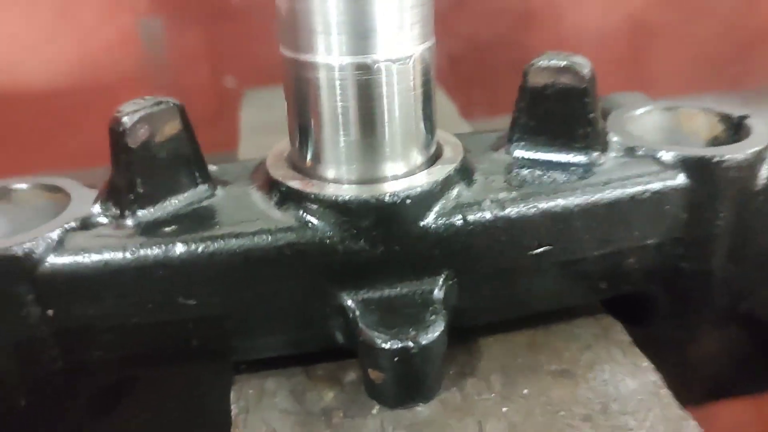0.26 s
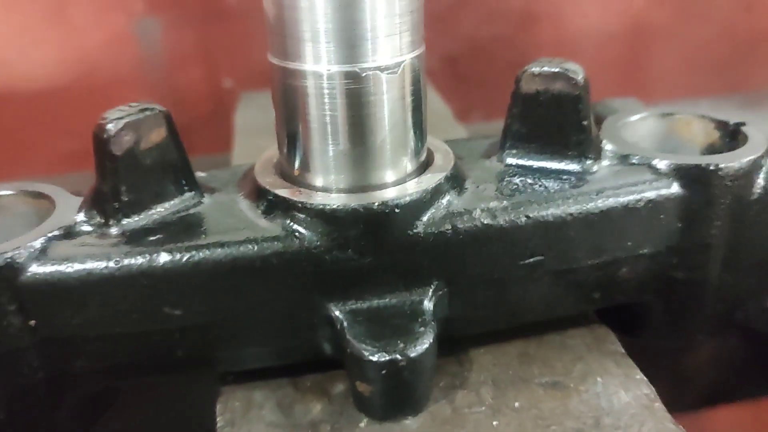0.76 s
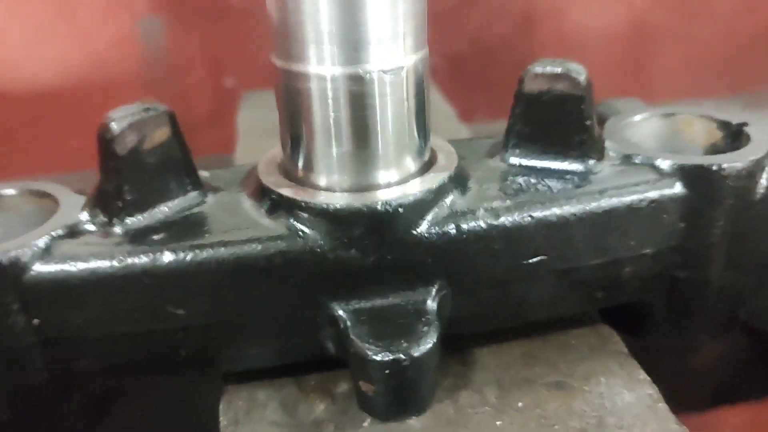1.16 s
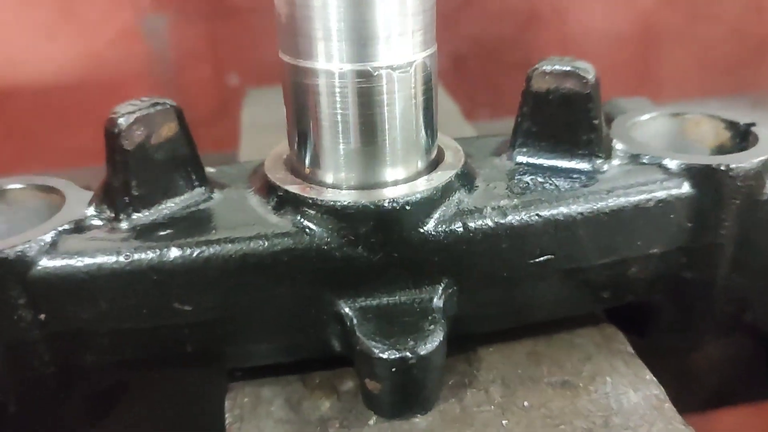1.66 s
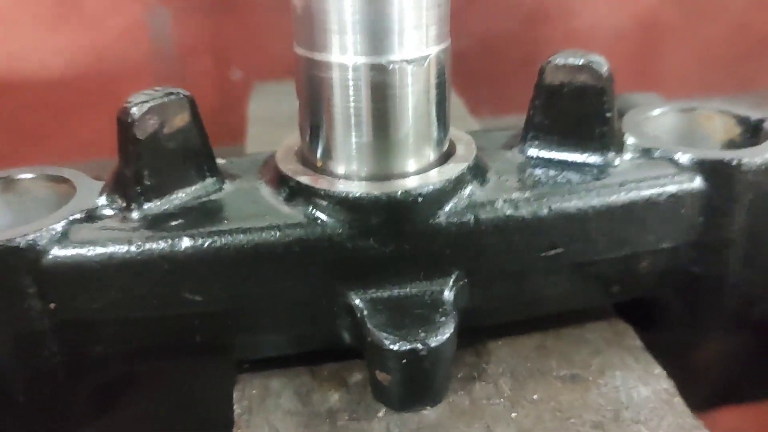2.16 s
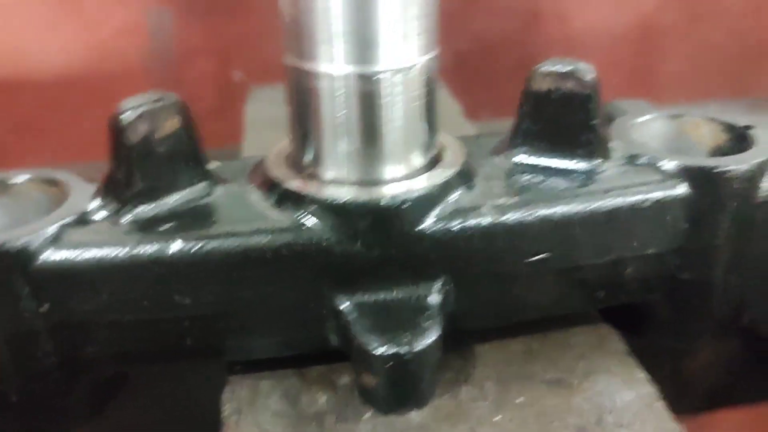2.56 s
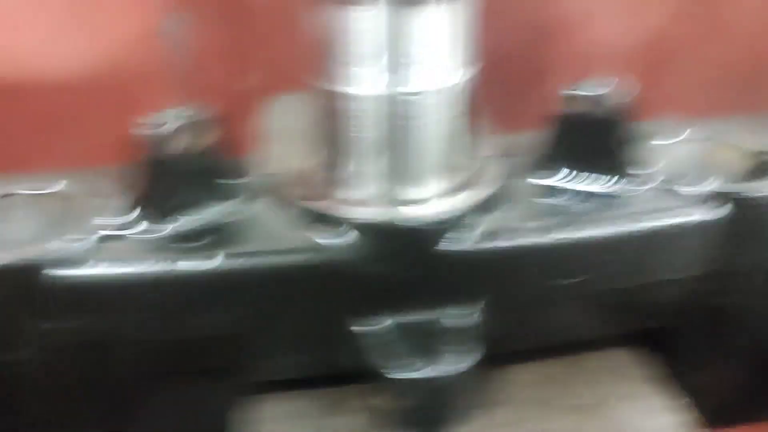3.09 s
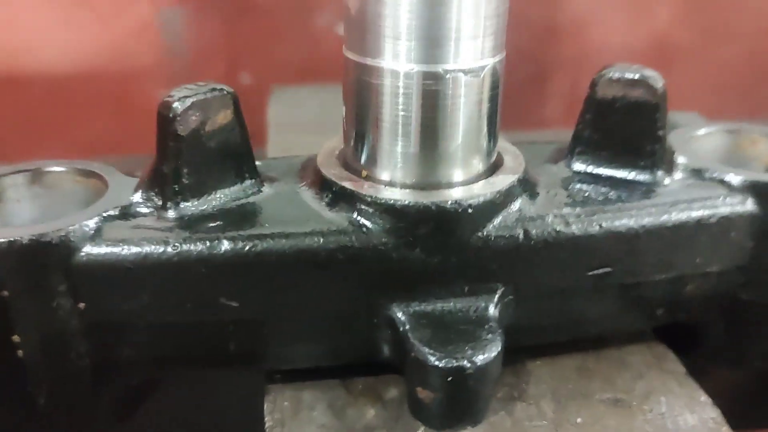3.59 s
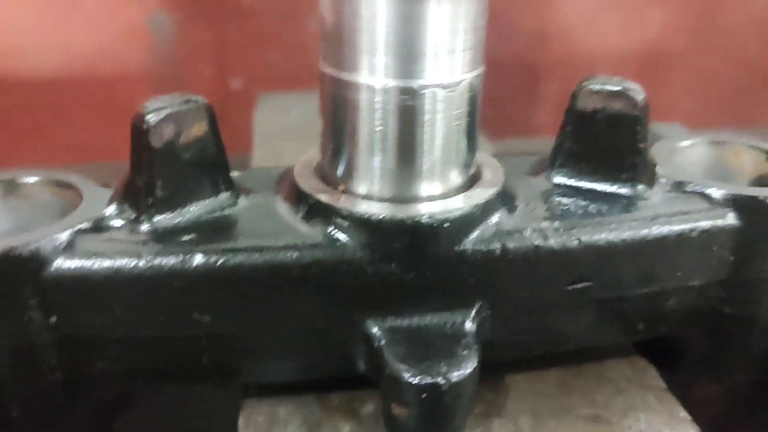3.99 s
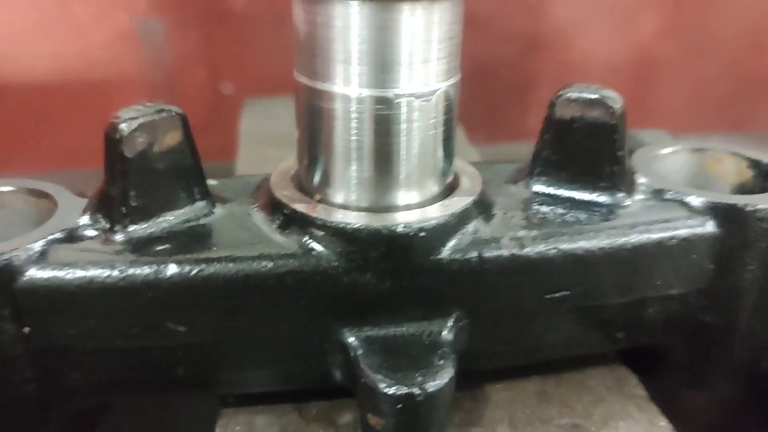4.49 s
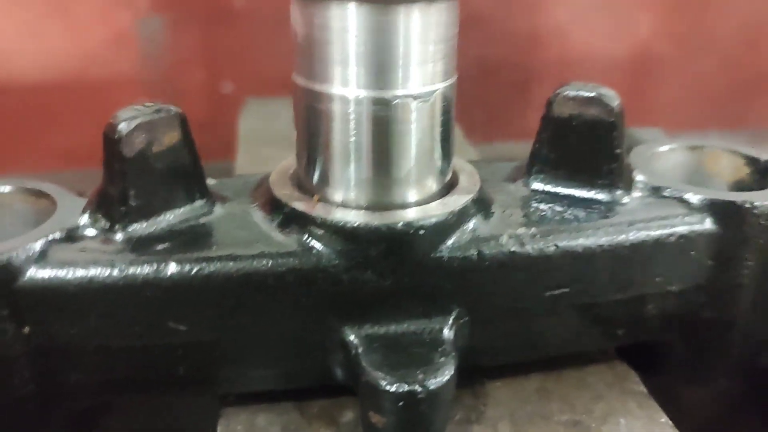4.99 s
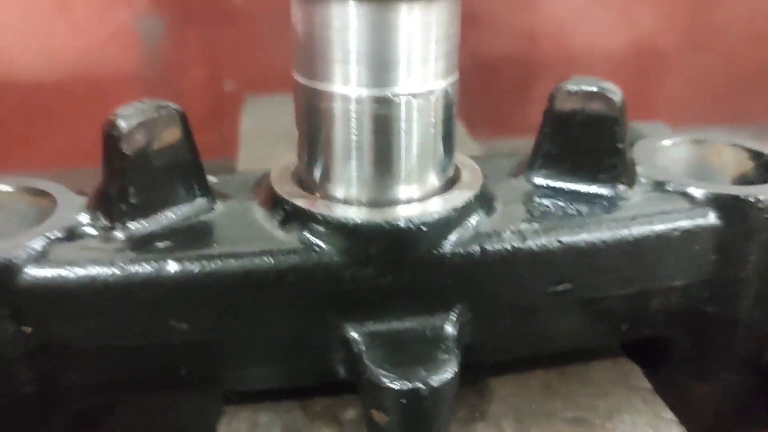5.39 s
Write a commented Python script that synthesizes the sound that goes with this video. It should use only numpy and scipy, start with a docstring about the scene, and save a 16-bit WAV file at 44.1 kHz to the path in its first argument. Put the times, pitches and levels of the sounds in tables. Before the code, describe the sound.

Eight even metallic pump strokes click, knock and rattle close up, with a faint low hum and rumble wavering beneath in a reverberant workshop.

```python
"""A hydraulic shop press is pumped by hand, eight strokes in a hard-walled workshop.
In each stroke a loose lever pin clacks, the linkage scrapes, catches and snaps tight, and oil whistles thinly.
The steel frame takes a knock, clatters, booms and ticks, then an after-knock, later and weaker as the load grows;
the lever is let go with a scrape, drops back on its stop and rattles.
A mains hum and a low rumble come and go over steady air; the hand-held microphone is bumped once."""
import sys
import numpy as np
from scipy import signal
from scipy.fft import rfft, irfft
from scipy.io import wavfile
from scipy.ndimage import uniform_filter1d

SR = 44100
rng = np.random.default_rng(int(sys.argv[2]) if len(sys.argv) > 2 else 0)


def digitize_waveform(pressure):
    """Quantize a signal to 16-bit integers and store it at the path in sys.argv[1].

    Rows of a 2-D input are taken as channels; values are limited to [-1, 1].
    """
    field = np.atleast_2d(pressure).T
    bounded = np.clip(field, -1, 1)
    quanta = np.round(bounded * 32767).astype(np.int16)
    wavfile.write(sys.argv[1], SR, quanta)


N = 249165
TIME = np.arange(N) / SR


def undb(db):
    """Decibels to gain."""
    return 10 ** (np.asarray(db) / 20)


def unit(x):
    """Scale to rms 1."""
    return x / np.sqrt(np.mean(x ** 2))


def at(table, hz):
    """Read a (Hz, value) table on a log-frequency axis."""
    table_hz, value = np.transpose(table)
    return np.interp(np.log(hz + 1), np.log(table_hz), value)


def swell(t, rise, fade):
    """Exponential growth up to t = 0 and decay after it; rise and fade are time constants in seconds."""
    return np.exp(np.minimum(t / max(rise, .0002), -t / max(fade, .0002)))


def noise(colour, size, alike_hz, treble_db=0):
    """Coloured noise at two microphones, alike in the bass, with a shelf above 8 kHz, scaled to rms 1."""
    hz = np.arange(size // 2 + 1) * SR / size
    mid, side = rfft(rng.standard_normal((2, size)))
    alike = .96 / (1 + (hz / alike_hz) ** 2)  # correlation of the two channels
    opposite = np.array([[1], [-1]])
    pair = np.sqrt(1 + alike) * mid + np.sqrt(1 - alike) * side * opposite
    shelf_db = treble_db * (1 + np.tanh((hz - 8000) / 500)) / 2
    return unit(irfft(pair * undb(at(colour, hz) + shelf_db), size))


def band(lo_hz, hi_hz):
    """A narrow band of noise at rms 1 whose own swells are partly evened out."""
    sos = signal.butter(2, [lo_hz, hi_hz], "band", fs=SR, output="sos")
    z = signal.hilbert(signal.sosfilt(sos, rng.standard_normal(N)))
    return unit(z.real / np.sqrt(np.abs(z)))


def grit(size, depth_db, count=60):
    """Uneven strength of contacts that follow each other every `count` samples, 60 being about a millisecond."""
    steps = np.repeat(rng.standard_normal(size // count + 1), count)[:size]
    return unit(uniform_filter1d(undb(depth_db * steps), count))


def ring(modes, t, detune, spread, scatter=3):
    """Decaying modes; each reaches the two microphones with its own phase, more so when high."""
    out = 0
    for hz, db, t60 in modes:
        f = hz * (1 + detune * rng.standard_normal())
        shared_phase = scatter * rng.standard_normal()
        # spread in radians per kHz
        phase = shared_phase + min(spread * hz / 1000, 2) * rng.standard_normal((2, 1))
        out = out + undb(db - 60 * t / t60) * np.sin(2 * np.pi * f * t + phase)
    return out


def add(out, s, sound):
    """Mix a stereo sound in at time s."""
    i = max(int(s * SR), 0)
    part = sound[:, :N - i]
    out[:, i:i + part.shape[1]] += part


# The pump strokes. Each row: time of the snap in seconds, snap level in dB, its treble above 8 kHz in dB,
# catch in seconds before the snap, catch level in dB, build-up of the knock in seconds,
# knock in seconds after the snap, knock level in dB.
STROKES = [(0.233, -23, 2, 0.034, -49, 0.017, 0.034, -27.5),
           (0.9551, -27.5, -4.5, 0.0066, -50, 0.016, 0.03, -28.5),
           (1.690, -20, -2, 0.037, -29, 0.02, 0.0048, -26.5),
           (2.371, -20, 3, 0.0063, -26.5, 0.014, 0.027, -24),
           (3.0895, -23.5, 2.5, 0.0122, -22, 0.018, 0.031, -27.5),
           (3.8261, -14.5, 2.5, 0.0265, -29.5, 0.0039, 0.005, -23.5),
           (4.5126, -24.5, -4, 0.0068, -44, 0.011, 0.014, -23.5),
           (5.2085, -22.5, 2.5, 0.0073, -44, 0.011, 0.030, -24)]
# Spectrum of the seating tick. Each row: frequency in Hz, level in dB.
SNAP_COLOUR = [(300, 1), (1500, -9), (3000, 6.5), (4200, 7), (5300, 13.5), (6100, 7), (7300, 12),
               (8800, -9), (11200, -1.5), (13200, 5.5), (14500, -6.5)]
# Modes of the small links. Each row: frequency in Hz, level in dB, t60 in seconds.
LINKS = [(3240, -14.5, 0.08), (3330, -14, 0.09)]
CRUNCH_DB = -11.5  # relative to the knock


def snaps(ring_db=-4, ping_hz=7300, ping_db=-1, ping_t60=0.015, rise=0.0015, fade=0.0031,
          crunch_rise=0.0023, crunch_fade=0.007, grit_db=4):
    """Steel faces crunch together under load and seat with a bright tick that rings the links."""
    out, t = np.zeros((2, N)), TIME[:SR // 4]
    lead, seat = .02, .001  # room for the build-up before the snap, time to seat after it, s
    for s, db, treble_db, *_, knock_db in STROKES:
        tick = swell(t - lead - seat, rise, fade) * noise(SNAP_COLOUR, len(t), 630, treble_db)
        crunch_shape = swell(t - lead - seat, crunch_rise, crunch_fade) * grit(len(t), grit_db)
        crunch = crunch_shape * noise(RATTLE_COLOUR, len(t), 600, 1.5)
        add(out, s - lead, undb(db) * tick + undb(knock_db + CRUNCH_DB) * crunch)
        ping = ring([(ping_hz, ping_db, ping_t60)], t, detune=0.025, spread=0.0084)
        links = undb(ring_db) * ring(LINKS, t, detune=0.00299, spread=0.04)
        add(out, s, undb(db) * np.minimum(t / seat, 1) * (ping + links))
    return out


TOUCH_S, TOUCH_DB = 0.0074, -40.5  # the faces touch lightly this long before each snap


def catches(rise=0.00013, fade=0.0024, treble_db=3, ping_hz=11250, ping_db=-1, ping_t60=0.014):
    """Before it seats, the linkage catches and also touches lightly, each with a thin tick and a high ping."""
    out, t = np.zeros((2, N)), TIME[:SR // 16]
    lead, seat = .005, .001  # s
    for s, _, _, earlier, catch_db, *_ in STROKES:
        for before, db in [(earlier, catch_db), (TOUCH_S, TOUCH_DB)]:
            tick = swell(t - lead - seat, rise, fade) * noise(SNAP_COLOUR, len(t), 630, treble_db)
            ping = ring([(ping_hz, ping_db, ping_t60)], t, detune=0.0055, spread=0.014)
            add(out, s - before - lead, undb(db) * tick)
            add(out, s - before, undb(db) * np.minimum(t / seat, 1) * ping)
    return out


# after-knock of the first stroke: delay and level relative to its knock, and their change per stroke
AFTER_S, AFTER_STEP_S, AFTER_DB, AFTER_STEP_DB, AFTER_BUILD_S = 0.136, 0.0155, -5, -2.5, 0.0034
BOOM_DB, AFTER_BOOM_DB = -37, -42.5  # boom after a knock; after an after-knock before its weakening


def knocks():
    """Two knocks on the frame per stroke, as rows of (s, clatter dB, boom dB, build-up s)."""
    rows = []
    for k, (s, *_, build, delay, db) in enumerate(STROKES):
        knock_s = s + delay
        after_s = knock_s + AFTER_S + k * AFTER_STEP_S
        weaker_db = AFTER_DB + k * AFTER_STEP_DB
        rows.append((knock_s, db, BOOM_DB, build))
        rows.append((after_s, db + weaker_db, AFTER_BOOM_DB + weaker_db, AFTER_BUILD_S))
    return rows


# Spectrum of the loose frame parts. Each row: frequency in Hz, level in dB.
CLATTER_COLOUR = [(100, 2.5), (160, 15), (260, -5), (520, 4), (850, 2.5), (1200, 2), (2000, -1.5),
                  (2900, 2.5), (4000, -7), (5200, -21.5), (6000, -17.5), (7200, -7.5), (8500, -78),
                  (13500, -43)]


def clatter(fade=0.017, lag_1khz=.01, grit_db=4, port_lag=0.00019):
    """Loose parts of the frame clatter; bending waves are slower when low, so the bass comes late."""
    out, t = np.zeros((2, N)), TIME[:SR * 2 // 5]
    hz = np.arange(len(t) // 2 + 1) * SR / len(t)
    lead = .08  # room for the build-up, s
    late = np.exp(-4j * np.pi * lag_1khz * np.sqrt(1000 * hz))  # delay falls as 1 / sqrt(frequency)
    ports = np.exp(-2j * np.pi * hz * np.array([[port_lag], [0]]))  # the left microphone is further away
    for s, db, _, build in knocks():
        burst = swell(t - lead, build, fade) * noise(CLATTER_COLOUR, len(t), 770)
        burst = irfft(rfft(burst) * late * ports, len(t)) * grit(len(t), grit_db, count=110)
        add(out, s - lead - lag_1khz / 2, undb(db) * burst)
    return out


# Modes of the frame. Each row: frequency in Hz, level in dB, t60 in seconds.
FRAME = [(122.6, 5, 0.29), (138.7, -7.5, 0.61), (154.06, 3.5, 0.69), (187.6, 1, 0.7), (204, -4, 0.61),
         (247, -13.5, 1), (300.4, -9.5, 1.0), (381, -12.5, 1.0), (494, -5, 0.29), (555, 4, 0.21),
         (604, -8.5, 0.86), (820, 6, 0.085), (889, -6.5, 0.28), (984, -16, 1), (1298, -35, 0.39),
         (1433, -10.5, 1), (2780, -15, 0.8), (3240, -49, 0.49)]


def booms(rise=0.0023, delay=.014):
    """The heavy frame swings up in its modes after each knock."""
    out, t = np.zeros((2, N)), TIME[:SR * 3 // 5]
    for s, _, db, _ in knocks():
        frame = ring(FRAME, t, detune=0.0025, spread=0.98, scatter=1.81)
        add(out, s + delay, undb(db) * (1 - np.exp(-t / rise)) * frame)
    return out


def creaks(level_db=-12, spread_db=3, settle=.13, fade=0.0025, count=7):
    """After each knock the loaded press settles with faint ticks that thin out."""
    out, t = np.zeros((2, N)), TIME[:2048]
    for s, db, _, _ in knocks():
        # waits count in units of `settle` seconds, and later ticks are weaker
        for wait, size in zip(rng.exponential(1, count), rng.standard_normal(count)):
            tick = np.exp(-t / fade - wait / 2) * noise(RATTLE_COLOUR, len(t), 900, treble_db=-2.5)
            tick_db = db + level_db + spread_db * size
            add(out, min(s + settle * wait, TIME[-1]), undb(tick_db) * tick)
    return out


def valve(level_db=-48, per_knock_db=3, hz=12850, width_hz=130, rise=0.012, hold=0.06, fade=0.039):
    """From each snap oil squeezes through the valve with a thin whistle, much stronger in heavy strokes."""
    out, t = np.zeros((2, N)), TIME[:SR // 3]
    sos = signal.butter(1, [hz - width_hz / 2, hz + width_hz / 2], "band", fs=SR, output="sos")
    shape = np.minimum(t / rise, 1) * np.exp(-np.maximum(t - hold, 0) / fade)
    heaviest_db = max(row[-1] for row in STROKES)
    for s, *_, knock_db in STROKES:
        whistle = unit(signal.sosfilt(sos, rng.standard_normal((2, len(t)))))
        whistle_db = level_db + per_knock_db * (knock_db - heaviest_db)
        add(out, s, undb(whistle_db) * shape * whistle)
    return out


# A pin takes up its play as the lever is pushed.
# Each row: start in seconds, level in dB, pitch of the pin in Hz.
CLACKS = [(0.1503, -26, 4050), (0.8720, -22.5, 3920), (1.590, -23.5, 2830), (2.2962, -28, 2790),
          (3.0062, -23, 4220), (3.7237, -27.5, 4380), (4.4260, -25, 2780), (5.1359, -30, 2600)]
# Spectrum of a hard scrape or crack. Each row: frequency in Hz, level in dB.
CLACK_COLOUR = [(200, 0), (900, -2.5), (1700, 6), (3000, 11), (4500, 8), (6000, 9), (7400, 6.5), (8500, -2),
                (11000, 6.5), (14000, 8)]


def clacks(rise=0.0017, hold=0.00022, fade=0.0054, grit_db=3, ring_db=-6, ring_t60=0.044, treble_db=-18.0):
    """A pin crosses its play, scrapes briefly into its seat and rings."""
    out, t = np.zeros((2, N)), TIME[:SR // 16]
    shape = np.exp(-np.maximum(t - hold, 0) / fade)
    for s, db, hz in CLACKS:
        scrape = shape * grit(len(t), grit_db) * noise(CLACK_COLOUR, len(t), 380, treble_db)
        pin = ring([(hz, ring_db, ring_t60)], t, detune=0.002, spread=0.41)
        add(out, s, undb(db) * np.minimum(t / rise, 1) * (scrape + pin))
    return out


# The lever is let go and drops back on its stop. Each row: time of the drop in seconds, level in dB,
# tilt of the ring in dB per octave, bounce in seconds after the drop, bounce level in dB relative to the drop,
# level of the scrape on letting go in dB.
RETURNS = [(0.5375, -33.5, -1.5, 0.0044, -6, -35.5), (1.2713, -24, 2.5, 0.016, -5, -43.5),
           (2.0020, -35, -1.5, 0.0025, -6, -55), (2.6502, -39, -1.5, 0.031, 1.5, -56),
           (3.4134, -15.5, 4, 0.011, -14, -47.5), (4.1423, -25.5, 1.5, 0.003, -31, -33.5),
           (4.8306, -38.5, -5, 0.014, -5, -49), (5.5146, -24, 7.5, 0.0042, -13, -35)]
# Modes of the lever. Each row: frequency in Hz, level in dB, t60 in seconds.
LEVER = [(1546, 8, 0.011), (2648, 0.5, 0.048), (2740, 0, 0.053), (3486, -8, 0.038), (3923, -4.5, 0.044),
         (3987, 12.5, 0.01), (5275, 4, 0.021), (6854, -2, 0.023)]


def clanks(crack_db=-2, ring_db=-4, ring_per_db=0.04, treble_db=-14, rise=0.0018, contact=0.0046):
    """The free lever hits, bounces once and rings; harder hits ring more, and each drop tilts its modes."""
    out, t = np.zeros((2, N)), TIME[:SR // 5]
    hardest_db = max(row[1] for row in RETURNS)
    for s, db, tilt, bounce, bounce_db, _ in RETURNS:
        modes = [(hz, mode_db + tilt * np.log2(hz / 4000), t60) for hz, mode_db, t60 in LEVER]
        for wait, hit_db in [(0, db), (bounce, db + bounce_db)]:
            crack = noise(CLACK_COLOUR, len(t), 700, treble_db) * np.exp(-t / contact)
            lever_db = ring_db + ring_per_db * (hit_db - hardest_db)
            lever = undb(lever_db) * ring(modes, t, detune=0.0054, spread=0.13)
            hit = np.minimum(t / rise, 1) * (undb(crack_db) * crack + lever)
            add(out, s + wait, undb(hit_db) * hit)
    return out


TAKE_UP_S, TAKE_UP_DB, TAKE_UP_FADE_S = 0.028, -43.5, 0.033  # the linkage scrapes this long before each snap
LET_GO_S, LET_GO_FADE_S = 0.086, 0.0079  # the lever is let go this long before each drop
# The lever chatters in its guide after dropping.
# Each row: start in seconds, level in dB, treble above 8 kHz in dB, fade time constant in seconds.
RATTLES = [(0.604, -33, 11, 0.0046), (0.620, -31, -1, 0.0087), (1.34, -33.5, -2, 0.016),
           (2.035, -25.5, -1, 0.0075), (2.7138, -37.5, -4, 0.018), (4.180, -31.5, 1.5, 0.011),
           (4.877, -37, 2, 0.026), (5.5819, -24, 0, 0.0059)]
# Spectrum of small steel contacts. Each row: frequency in Hz, level in dB.
RATTLE_COLOUR = [(200, 11), (1000, 7.5), (2700, 9), (3250, 9.5), (4000, 6.5), (7000, 1.5), (8500, -8.5),
                 (13500, -2)]


def rattles(rise=0.0058, scrape_treble_db=-9, grit_db=5, ring_db=-6, ring_hz=3280, ring_width_hz=260):
    """Runs of tiny uneven contacts die away and ring the guide: taking up, letting go, chattering."""
    out, t = np.zeros((2, N)), TIME[:SR // 5]
    guide = signal.iirpeak(ring_hz, ring_hz / ring_width_hz, fs=SR)
    take_ups = [(s - TAKE_UP_S, TAKE_UP_DB, scrape_treble_db, TAKE_UP_FADE_S) for s, *_ in STROKES]
    let_gos = [(s - LET_GO_S, db, scrape_treble_db, LET_GO_FADE_S) for s, *_, db in RETURNS]
    for s, db, treble_db, fade in take_ups + let_gos + RATTLES:
        shape = np.minimum(t / rise, 1) * np.exp(-t / fade) * grit(len(t), grit_db)
        contacts = shape * noise(RATTLE_COLOUR, len(t), 720, treble_db)
        ringing = unit(signal.lfilter(*guide, contacts)) * np.std(contacts)
        add(out, s, undb(db) * (contacts + undb(ring_db) * ringing))
    return out


# The pump sits to the right, so the left microphone is shaded.
# Each row: frequency in Hz, left minus right in dB.
SHADE = [(2500, -0.5), (5500, -2.5), (7200, -7), (10500, -19), (13000, 0)]


def shaded(pair):
    """Treble from the pump is weaker at the far microphone; half the difference goes to each channel."""
    hz = np.arange(N // 2 + 1) * SR / N
    half_db = at(SHADE, hz) * np.array([[1], [-1]]) / 2
    return irfft(rfft(pair) * undb(half_db), N)


# Reverberation of the workshop. Each row: frequency in Hz, t60 in seconds.
ROOM_T60 = [(150, 0.88), (600, 1.0), (3000, 0.61), (7000, 0.76), (14000, 0.48)]


def workshop(dry, early_db=-2, early_fade=0.062, gap=0.0011):
    """Close reflections from the press itself, then the long tail of the room, as decaying noise by octave."""
    t = TIME[:SR]
    hz = np.arange(len(t) // 2 + 1) * SR / len(t)
    spectrum = rfft(noise([(20, 0), (20000, 0)], len(t), 600))
    centres = 125 * 2. ** np.arange(8)
    tail = 0
    for centre, weights in zip(centres, np.eye(len(centres))):
        # each octave fades in and out towards its neighbours
        part = irfft(spectrum * at(np.column_stack([centres, weights]), hz), len(t))
        tail = tail + part * np.exp(-np.log(1000) * t / at(ROOM_T60, centre))
    tail = tail * (1 + undb(early_db) * np.exp(-t / early_fade)) * (t > gap)
    return signal.fftconvolve(dry, unit(tail) / np.sqrt(len(t)), axes=1)[:, :N]


# Spectrum of the shop air. Each row: frequency in Hz, level in dB.
SHOP = [(15, -37), (25, -14.5), (99, -1), (219, -17.5), (498, -14.5), (649, -19), (1190, -23),
        (2940, -20.5), (4250, -30), (7220, -28.5), (9170, -43), (14000, -36)]
# Partials of the hum. Each row: frequency in Hz, level in dB before the gains of hum and overtones.
HUM = [(100.6, -1), (301, -19), (382, -13), (501, -10.5), (700, -18.5)]
# Course of the lowest hum partial. Each row: time in seconds, level in dB before the hum gain.
HUM_LEVEL = [(0.1, -48.0), (0.8, -50.5), (1.15, -45.5), (1.4, -58), (1.8, -48), (2.2, -56.0), (5.6, -53)]
# Course of the rumble. Each row: time in seconds, level in dB before the rumble gain.
RUMBLE_LEVEL = [(0, -52.5), (0.5, -49.5), (1.0, -55), (1.7, -56), (1.95, -49), (2.4, -66), (2.65, -50.5),
                (3.1, -55), (5.0, -62), (5.55, -49.5)]
GRIP_S, GRIP_DB, GRIP_RISE_S, GRIP_FADE_S = 3.54, -35.5, 0.075, 0.079  # the hand shifts its grip


def background(air_db=-51.0, hum_db=1, overtones_db=-55, rumble_db=3, waver=0.48):
    """Steady air, a wavering mains hum, a low rumble and one bump of the hand-held microphone."""
    hum_level = undb(np.interp(TIME, *np.transpose(HUM_LEVEL)))
    rumble_level = undb(np.interp(TIME, *np.transpose(RUMBLE_LEVEL)))
    drift = waver * band(0.33, 14.0)  # phase shared by all partials, radians
    lines = [np.sqrt(2) * undb(db) * np.sin(2 * np.pi * hz * TIME + drift) for hz, db in HUM]
    # only the lowest partial comes and goes
    hum = undb(hum_db) * hum_level * lines[0] + undb(overtones_db) * sum(lines[1:])
    rumble = undb(rumble_db) * rumble_level * band(35.6, 59.2)
    handling = undb(GRIP_DB) * swell(TIME - GRIP_S, GRIP_RISE_S, GRIP_FADE_S) * band(9.3, 13.5)
    air = undb(air_db) * noise(SHOP, N, 450)
    return air + hum + rumble + handling


def scene():
    """Contacts are heard directly and through the room; booms, whistle and background only directly."""
    pins, lever, frame = clacks(), clanks(), clatter()
    ticks = snaps() + catches()
    chatter = rattles() + creaks()
    sent = undb(-4) * (pins + lever) + undb(-4.5) * ticks + undb(-3) * (chatter + frame)
    direct = shaded(pins + lever + ticks + chatter) + frame
    return direct + booms() + valve() + workshop(sent) + background()


TOP_HZ = 14400


def record(dry):
    """A steep low-pass, run both ways to keep the phase, cuts the top."""
    return signal.sosfiltfilt(signal.butter(14, TOP_HZ, fs=SR, output="sos"), dry)


dry = scene()
out = record(dry)
digitize_waveform(out)
```